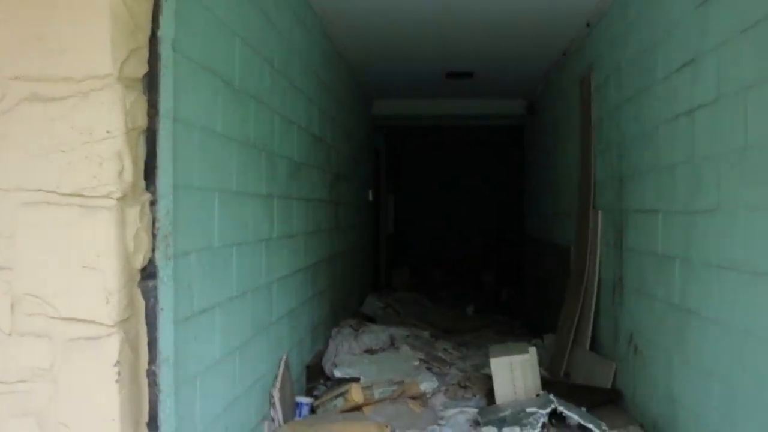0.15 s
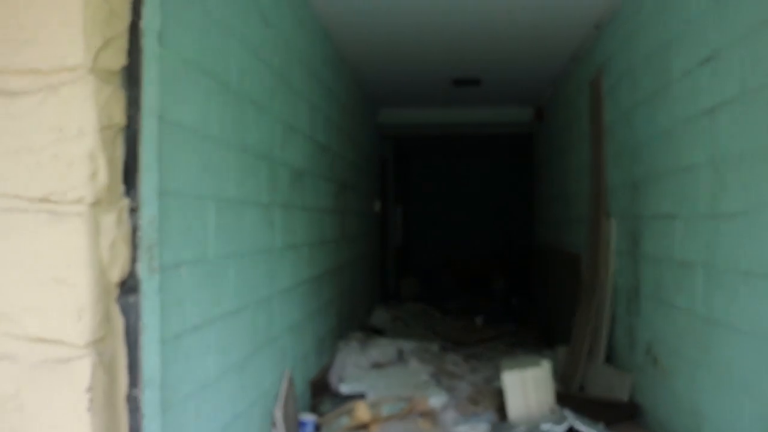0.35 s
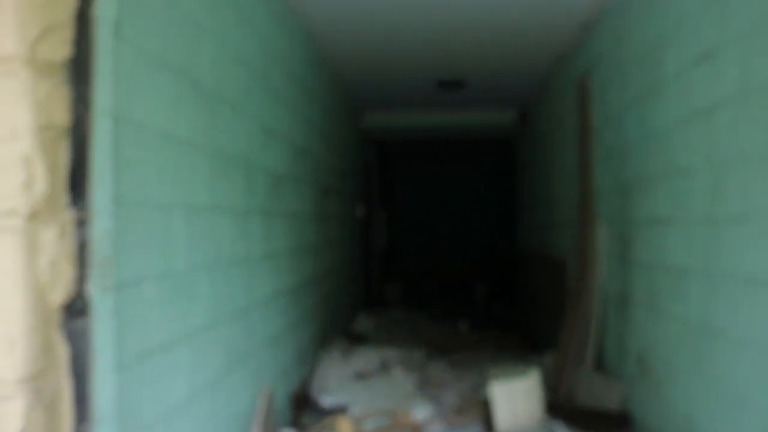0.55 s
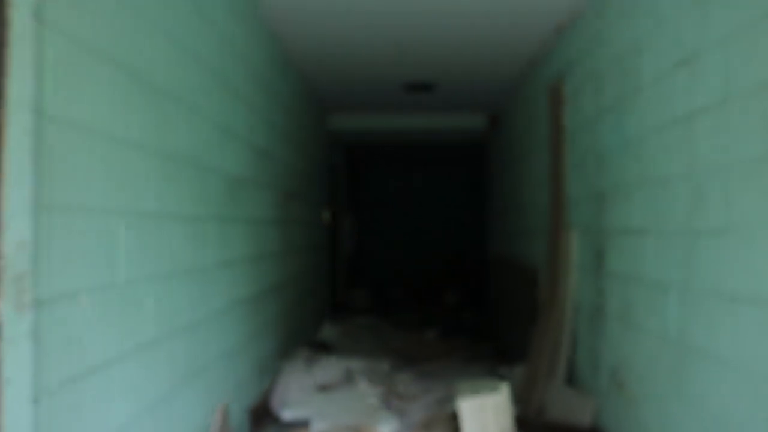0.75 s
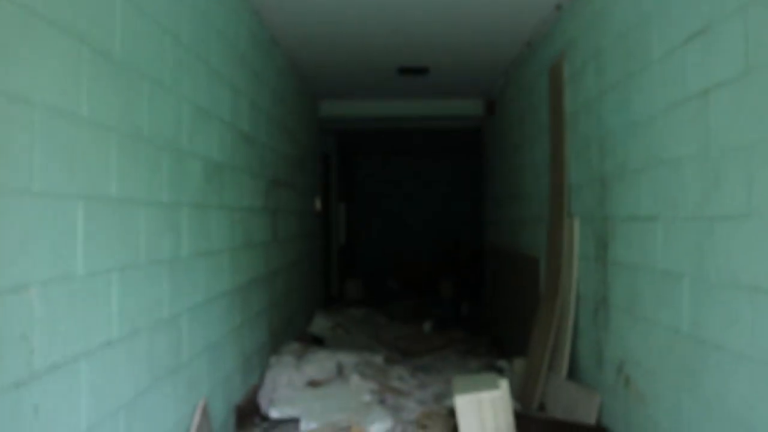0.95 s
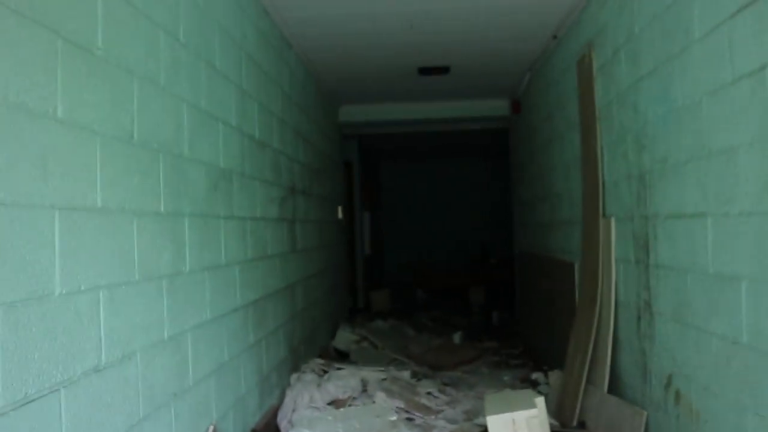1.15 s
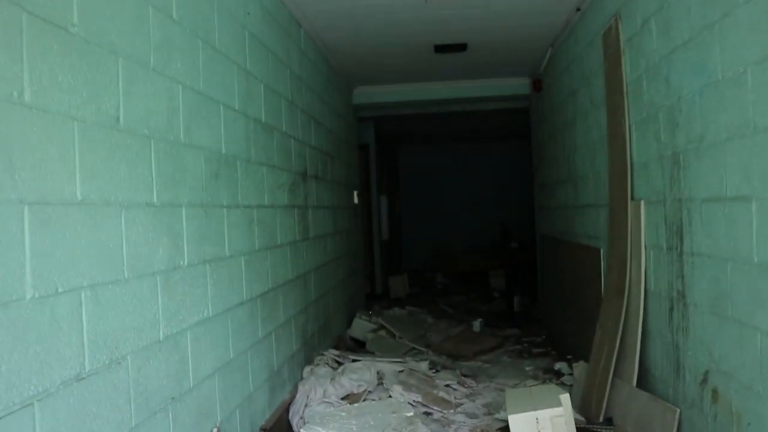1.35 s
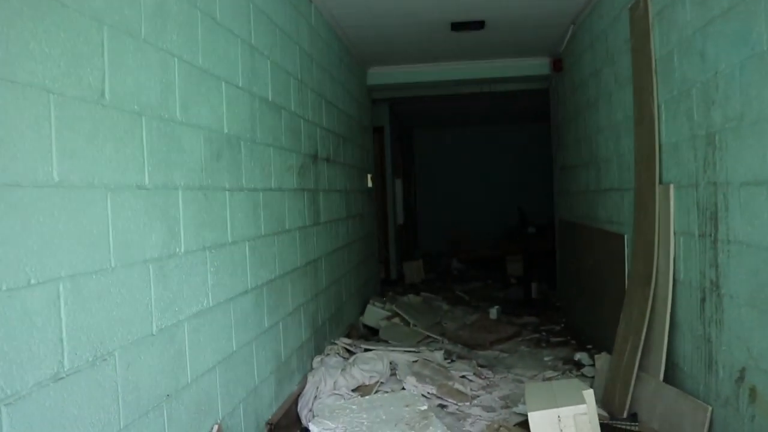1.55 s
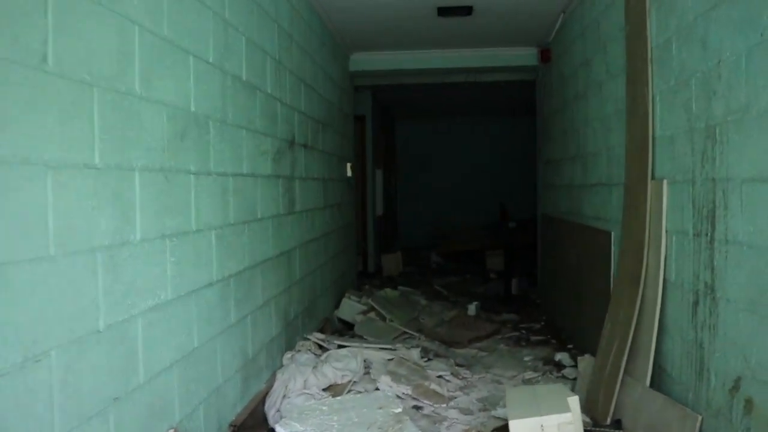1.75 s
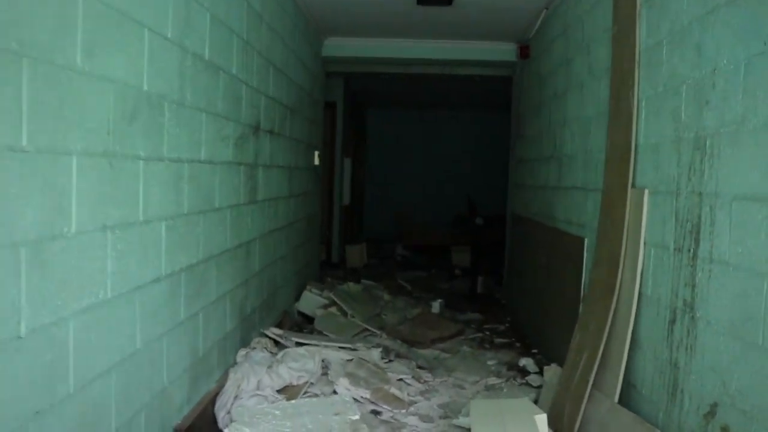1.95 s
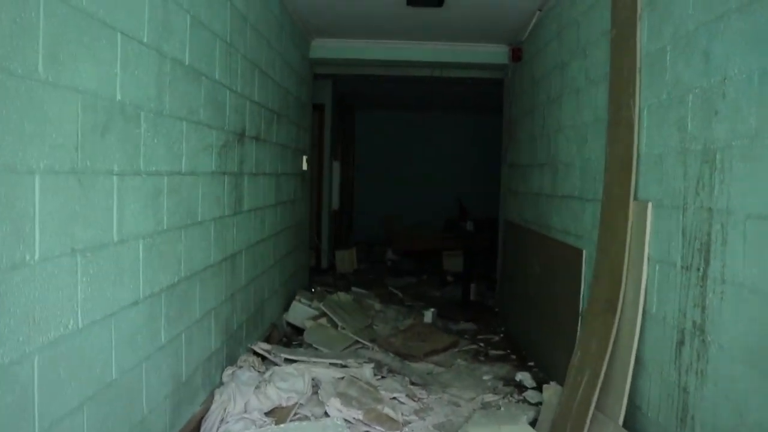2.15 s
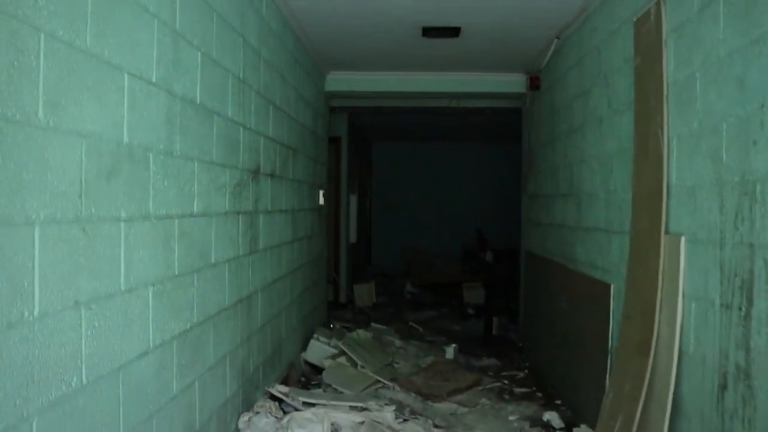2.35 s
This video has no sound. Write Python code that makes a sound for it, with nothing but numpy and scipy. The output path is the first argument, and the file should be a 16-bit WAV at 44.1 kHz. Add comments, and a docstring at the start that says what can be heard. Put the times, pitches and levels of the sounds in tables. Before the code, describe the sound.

Someone steps into a wrecked, narrow corridor, crunching grit, cracking a hollow scrap and kicking tinkling glass, then treading more lightly with small ticks. Close stereo pickup, short slapping echoes, soft outdoor insects and light hiss.

```python
"""Footsteps among rubble in a corridor

A walker steps from a doorway into a narrow, bare block corridor strewn with rubble. A sole crunches grit (showers of
short resonances), a hollow scrap pops and small bits snap (struck resonators), and a kicked glass shard bounces
(ringing modes). The close walls return a flutter of echoes (a damped delay loop) and a diffuse tail. Insects and
a far rumble outside (filtered noise) fade as the microphone moves in; a hum, a drone and microphone hiss lie under."""
import sys
import numpy as np
from scipy import signal
from scipy.fft import rfft, irfft, next_fast_len
from scipy.io import wavfile
from scipy.ndimage import uniform_filter1d

SR = 44100
rng = np.random.default_rng(int(sys.argv[2]) if len(sys.argv) > 2 else 0)


def to_wav(sig):
    """Store sig (one row per channel, or 1-D mono) as 16-bit WAV at the path in sys.argv[1].

    Samples outside -1..1 are clipped; the rate is SR.
    """
    pcm = np.clip(np.atleast_2d(sig), -1, 1) * 32767
    pcm = np.round(pcm).astype(np.int16)
    wavfile.write(sys.argv[1], SR, pcm.T)  # frames by channels


def voltage_ratio(level):
    """Linear amplitude factor for a level in decibels (scalar or array-like)."""
    return 10 ** (np.asarray(level, float) / 20)


N = 110250


def rms_one(x):
    """Normalisation of power: scales a signal to rms 1."""
    return x / np.sqrt(np.mean(x ** 2) + 1e-20)


def in_time(rows):
    """Piecewise-linear envelopes: table columns joined by straight lines, one value a sample."""
    s, *columns = np.transpose(rows)
    return [np.interp(np.arange(N) / SR, s, column) for column in columns]


def at_hz(points, hz):
    """Spectral interpolation: reads a spectrum on a logarithmic frequency axis."""
    table_hz, values = np.transpose(points)
    return np.interp(np.log(hz), np.log(table_hz), values)


def sides(pan_db):
    """Level-difference stereo: left and right gains for a left-minus-right difference in dB."""
    return voltage_ratio(np.array([[.5], [-.5]]) * pan_db)


def drift(rate_hz):
    """Random modulation: noise through a two-pole low-pass near rate_hz, of rms 1."""
    step = 20   # computed at every 20th sample, then interpolated
    r = np.exp(-2 * np.pi * rate_hz * step / SR)
    noise = rng.standard_normal(N // step + 2002)
    slow = signal.lfilter([1], [1, -2 * r, r * r], noise)[2000:]   # skip the onset
    return np.interp(np.arange(N) / step, np.arange(len(slow)), rms_one(slow))


def ring(clicks, hz, t60):
    """Damped oscillation: a unit click sets going a sine of initial height 1, falling 60 dB in t60 s."""
    r, w = voltage_ratio(-60 / (t60 * SR)), 2 * np.pi * hz / SR
    return signal.lfilter([0, np.sin(w)], [1, -2 * r * np.cos(w), r * r], clicks + 1e-18)


# A sole pressing and dragging grit: t/s, level/dB, f/Hz of the emphasised grains,
# tilt towards small, high grains/(dB per octave)
SOLE_PRESSURE = [(0, -33, 2470, 1), (.03, -44, 2450, 0.5), (.1, -57.5, 1690, -4), (.236, -61, 4000, 2.5),
                 (.246, -24.5, 3930, 0), (.258, -27.5, 3530, 1.5), (.268, -22.5, 730, 0),
                 (.29, -22.5, 1070, 1), (.315, -29.5, 1470, 3), (.335, -34.5, 1500, 1.5),
                 (.39, -42, 3000, 3.5), (.41, -18.5, 7100, 0), (.435, -29.5, 5500, 4.5),
                 (.46, -29.5, 5600, 2), (.5, -41, 4900, 0.5), (.575, -46, 5970, 3), (.59, -23, 6800, 1),
                 (.64, -49.5, 6700, -1), (1.05, -59.5, 3000, 1), (1.15, -44, 1450, 2),
                 (1.195, -47, 4060, -0.5), (1.203, -33.5, 5550, 0.5), (1.24, -41, 5100, 0.5),
                 (1.33, -58, 3000, 7), (1.6, -61, 2007, 5), (1.65, -38.5, 2520, -3), (1.7, -64, 2000, 12.5),
                 (1.8, -49, 1510, 2.5), (1.85, -42, 610, -0.5), (1.89, -47, 497, -3.5),
                 (1.92, -40, 1290, -2), (1.97, -54.5, 1000, 4), (2.02, -42.5, 890, -2),
                 (2.07, -54, 3030, 9), (2.11, -46, 1500, -0.5), (2.2, -76, 2000, 18)]
# Weight of the grains by pitch: f/Hz, level/dB
GRAIN_WEIGHT = [(250, -15), (500, -10), (800, -10.5), (1400, -10.5), (2500, -13.5), (4000, -13),
                (7000, -15), (10500, -22.5), (15500, -30)]
GRAINS_PER_S, GRAIN_SPREAD_DB = 12000, 0.5   # median rate; scale of the random spread in strength
GRAIN_T60_CYCLES = 20.7
GRAIN_PEAK_OCTAVES, GRAIN_PEAK_DB = 0.21, 6   # width and height of the emphasis


def grit():
    """Granular excitation: grains crack at random, each ringing briefly, stressed near the sole's pitch."""
    level_db, peak_hz, tilt_db = in_time(SOLE_PRESSURE)
    strength = voltage_ratio(GRAIN_SPREAD_DB * np.minimum(rng.exponential(1, N), 5)) * rng.choice([-1, 1], N)
    born = rng.random(N) < GRAINS_PER_S * voltage_ratio(2.2 * drift(80)) / SR
    pitches = np.geomspace(300, 15000, 28)
    dealt = rng.integers(0, len(pitches), N)
    grain_hz = pitches[dealt]
    octaves_off = np.log2(grain_hz / peak_hz)
    near_db = GRAIN_PEAK_DB * np.exp(-.5 * (octaves_off / GRAIN_PEAK_OCTAVES) ** 2)
    colour = voltage_ratio(near_db + tilt_db * np.log2(grain_hz / 2000))
    clicks = strength * born * colour * sides(rng.normal(0, 1.33, N))
    out = np.zeros((2, N))
    for k, hz in enumerate(pitches):
        lag = rng.integers(-5, 6)   # samples between the two microphone ports
        weight = voltage_ratio(at_hz(GRAIN_WEIGHT, hz)) * hz
        left, right = weight * ring(clicks * (dealt == k), hz, GRAIN_T60_CYCLES / hz)
        out += [left, np.roll(right, lag)]
    # even out the running rms so that the level follows the table
    running_rms = np.sqrt(uniform_filter1d(np.mean(out ** 2, axis=0), size=4000) + 1e-20)
    return voltage_ratio(level_db) * out / running_rms


# Bits that snap, pop or thud underfoot: t/s, peak level of the pulse before panning/dB, nominal f/Hz,
# relative ring length/cycles, left-minus-right level/dB
SNAP_EVENTS = [(.007, -19.5, 5800, 1.3, -2), (0.2344, -23, 3000, .8, 3), (.2337, -31, 9000, 8.0, 0),
               (.263, -19, 740, 7.3, -3), (0.3958, -2.5, 1130, 2.9, 0.5), (0.398, -9.5, 2350, 4.2, 7.5),
               (0.242, -20, 3860, 14, -6), (.3965, -18, 8800, 2.0, 0), (0.414, -27, 7800, 13, 0),
               (1.84, -42, 130, 2.5, -15), (.4505, -11, 1356, 4.5, 1.5), (0.5823, -8.5, 4630, 0.5, -5.5),
               (.815, -47, 79.5, 4.0, 0), (1.1985, -9, 6000, 1.8, -1), (1.204, -20.5, 1050, 1.7, 0),
               (1.4267, -31.5, 11400, 9.0, 10), (1.473, -38, 594, 5.5, -3), (1.508, -29.5, 6530, 3.0, -4),
               (1.644, -28, 2110, 2.8, -6), (1.7087, -36, 7540, 3.4, -2), (1.7498, -20, 7780, 3.0, -3),
               (1.816, -23.5, 1420, 1.35, 2), (0.588, -30.5, 480, 1.9, 1), (1.65, -32, 2250, 1.8, 7),
               (2.026, -36, 11000, 3.2, 0), (2.051, -38, 8500, 3.0, 0), (1.837, -27, 336, 1.7, -1),
               (1.8417, -46, 6000, 1.5, -1), (1.9344, -14, 7750, 5.7, -10), (2.0629, -30.5, 8800, 3.3, -7)]
SPLINTER_DB, SPLINTER_T60_CYCLES = -14.5, 204   # splinters that patter after a snap


def fragment(excitation, hz, t60):
    """Cascaded resonance: two detuned damped oscillators in series, high-passed below their pitch."""
    rung = ring(ring(excitation, hz * 1.075, t60), hz / 1.05, t60)
    cut = signal.butter(3, 0.53 * hz, "high", fs=SR, output="sos")
    return signal.sosfilt(cut, rung)


def snaps():
    """Impulse response: a click and a dying patter of splinters both excite each fragment's resonance."""
    length = SR // 8
    out = np.zeros((2, N))
    patter = rng.standard_normal((len(SNAP_EVENTS), 2, length)) ** 3 / 4   # cubing makes it spiky
    for (s, level_db, hz, cycles, pan_db), noise in zip(SNAP_EVENTS, patter):
        t60 = 1.73 * max(cycles, .5) / hz
        pulse = fragment(np.arange(length) == 0, hz, t60)
        peak = np.abs(pulse).max()
        # low fragments have splinters that die as fast as those of 2500 Hz
        decay_db = -60 * np.arange(length) / SR * max(hz, 2500) / SPLINTER_T60_CYCLES
        splinters = fragment(noise * voltage_ratio(SPLINTER_DB + decay_db), hz, t60)
        splinters *= peak / np.sqrt(np.sum(pulse ** 2))
        snap = voltage_ratio(level_db) * sides(pan_db) * (pulse + splinters) / peak
        i = int(s * SR)
        out[:, i:i + length] += snap[:, :N - i]
    return out


# Modes of the glass shard: f/Hz, relative level/dB, t60/s
SHARD_MODES = [(1407, 3, .2), (2573, 8, 0.14), (3680, -0.5, 0.13), (5134, 7, 0.042), (6580, -4, 0.17),
               (6939, 5, 0.075), (7348, -4, 0.2), (9030, -4, 0.19), (10360, -1.5, 0.28), (10745, 3, 0.19),
               (12240, -12, 0.27), (12900, -10, 0.3), (14700, -7, 0.28)]
# Its strikes: t/s, relative level/dB, favoured f/Hz, reach about it/octaves, left-minus-right level/dB; those
# at .7098 and .8303 s repeat the hits just before them, about 8 ms later
SHARD_STRIKES = [(.413, -19.5, 12900, 0.091, 1), (.436, -28, 12900, 0.1, -2), (.497, -39, 3680, 0.2, 13),
                 (.5551, -28, 2490, 0.68, 4), (.5631, -23.5, 1470, 0.26, 5.5),
                 (.5826, -27, 9450, 0.33, -2.5), (.59, -22.5, 7040, 0.13, -1),
                 (0.608, -27.5, 3680, 0.25, 8), (.645, -39, 3680, 0.12, -7), (.702, -32.5, 2620, 0.45, 2.5),
                 (.7098, -37.5, 4050, 0.35, 0.5), (.823, -31.5, 4900, 0.19, -0.5),
                 (0.8303, -41.5, 5700, 1.0, 0.5)]
TUMBLE_DB, TUMBLE_HZ = 3, 64   # the shard turns as it flies: rms waver and its rate
TWIN_DETUNING, TWIN_DB, TWINS_FROM_HZ = .006, -5, 4500


def shard():
    """Modal synthesis: strikes excite all modes, favouring one pitch; high ones beat with a twin, all waver."""
    s, level_db, favoured_hz, reach, pan_db = np.transpose(SHARD_STRIKES)
    chance_db = rng.normal(0, 1.0, (len(s), len(SHARD_MODES)))
    start = int(s[0] * SR)
    strikes = (s * SR).astype(int) - start
    out = np.zeros((2, N))
    for k, (hz, mode_db, t60) in enumerate(SHARD_MODES):
        off_db = -np.minimum(5.6 * (np.log2(hz / favoured_hz) / reach) ** 2, 30)
        clicks = np.zeros((2, SR))
        clicks[:, strikes] = voltage_ratio(level_db + mode_db + off_db + chance_db[:, k]) * sides(pan_db)
        rung = ring(clicks, hz, t60)
        if hz > TWINS_FROM_HZ:
            rung += voltage_ratio(TWIN_DB) * ring(clicks, hz * (1 + TWIN_DETUNING), 0.63 * t60)
        left, right = rung * voltage_ratio(TUMBLE_DB * drift(TUMBLE_HZ)[:SR])
        lag = rng.integers(0, 7)   # samples between the two microphone ports
        out[:, start:start + SR] += [left, np.roll(right, lag)]
    return out


# Loss per round trip between the walls: f/Hz, level/dB
WALL_LOSS = [(100, -16.5), (600, -10.5), (900, -4.5), (1300, -3), (1800, -5), (2500, -6), (5000, -5.5),
             (16000, -21)]
# Decay of the diffuse tail: f/Hz, t60/s
TAIL_DECAY = [(100, 0.17), (1000, 0.25), (4000, 0.24), (9000, 0.32), (16000, 0.16)]
ROUND_TRIP_M, SOUND_M_S = 2.62, 343
FLUTTER_DB, TAIL_DB = -0.5, -15
PORT_LAG_S = 0.00011   # the left port hears the flutter later


def corridor(x):
    """Flutter echo and reverberation: direct sound, a wall-to-wall loop and ten looping paths a side."""
    size = next_fast_len(N + SR)
    hz = np.maximum(np.fft.rfftfreq(size, 1 / SR), 1)

    def delay(s):
        """Pure delay: a phase shift proportional to frequency."""
        return np.exp(-2j * np.pi * hz * s)

    spectrum = rfft(x, size)
    loop = np.minimum(voltage_ratio(at_hz(WALL_LOSS, hz)), .95) * delay(ROUND_TRIP_M / SOUND_M_S)
    flutter = voltage_ratio(FLUTTER_DB) * loop / (1 - loop) * np.array([delay(PORT_LAG_S), delay(0)])
    t60 = np.maximum(at_hz(TAIL_DECAY, hz), .05)
    tail = np.zeros((2, len(hz)), complex)
    for k, lag in enumerate(rng.uniform(.003, .035, 20)):
        path = voltage_ratio(-60 * lag / t60) * delay(lag)
        tail[k % 2] += np.sqrt(lag / 0.019) * path / (1 - path) * (-1) ** (k // 2)
    for lag in (.0011, .0023, .0047):   # all-pass filters thicken the echoes
        tail *= (delay(lag) - .6) / (1 - .6 * delay(lag))
    wet = spectrum * (1 + flutter) + voltage_ratio(TAIL_DB) * spectrum.mean(axis=0) * tail
    return irfft(wet, size)[:, :N]


# Correlation of left and right: f/Hz, coefficient
STEREO_CORRELATION = [(60, 0.89), (180, 0.89), (550, 0.77), (1650, -0.34), (4970, 0.063), (15000, -0.14)]
# Balance of the two sides: f/Hz, left-minus-right level/dB
STEREO_BALANCE = [(60, 1.5), (240, 1), (950, 0.5), (3770, -1.5), (15000, -0.5)]


def coloured(spectrum):
    """Spectral shaping: stereo noise of a given spectrum, correlation and balance, of rms 1."""
    hz = np.maximum(np.fft.rfftfreq(N, 1 / SR), 1)
    mid, side = rfft(rng.standard_normal((2, N)))
    alike = np.clip(at_hz(STEREO_CORRELATION, hz), -1, 1)
    pair = np.sqrt(1 + alike) * mid + np.sqrt(1 - alike) * side * [[1], [-1]]
    gains = voltage_ratio(at_hz(spectrum, hz)) * sides(at_hz(STEREO_BALANCE, hz))
    return rms_one(irfft(pair * gains, N))


def narrow(hz, width_hz, own):
    """Band-pass filtering: narrow noise of rms 1; own weights the part peculiar to each channel."""
    band = signal.butter(2, [hz - width_hz / 2, hz + width_hz / 2], "band", fs=SR, output="sos")
    return rms_one(signal.sosfilt(band, rng.standard_normal(N) + own * rng.standard_normal((2, N))))


# Outdoor sound through the doorway: t/s, relative rumble level/dB, mean insect level/dB
OUTDOOR_LEVELS = [(0.0, -46.5, -50.5), (0.3, -45.5, -49), (0.43, -47.5, -45.5), (0.88, -45.5, -52),
                  (1.38, -46.5, -52.5), (2.5, -50.5, -60.5)]
# Relative spectral density of the far rumble: f/Hz, level/(dB per Hz)
RUMBLE_SPECTRUM = [(15, -38), (25, -9), (81, -4), (229, -7), (622, -9.5), (812, -6), (1110, -9.5),
                   (1540, -9), (3070, -20), (5000, -24), (6500, -43), (11000, -120)]
INSECT_HZ, INSECT_WIDTH_HZ, INSECT_THROB_DB = 6080, 1000, 2
HUM_HZ, HUM_WIDTH_HZ, HUM_DB = 86.2, 8.4, -57   # low, and it wavers
DRONE_HZ, DRONE_WIDTH_HZ, DRONE_DB = 456, 67, -47.5   # faint and dull
DRONE_CENTRE_S, DRONE_SPREAD_S = 1.44, 0.087   # it swells once


def outside():
    """Amplitude-modulated noise bands: far rumble, a hum, a drone that swells once and throbbing insects."""
    rumble_db, insect_db = in_time(OUTDOOR_LEVELS)
    rumble = coloured(RUMBLE_SPECTRUM) * voltage_ratio(rumble_db + 2.5 + 0.27 * drift(18))
    hum = narrow(HUM_HZ, HUM_WIDTH_HZ, own=0.21) * voltage_ratio(HUM_DB)
    swell = np.exp(-.5 * ((np.arange(N) / SR - DRONE_CENTRE_S) / DRONE_SPREAD_S) ** 2)
    drone = narrow(DRONE_HZ, DRONE_WIDTH_HZ, own=.3) * voltage_ratio(DRONE_DB) * swell
    throb_db = INSECT_THROB_DB * drift(56)
    insects = narrow(INSECT_HZ, INSECT_WIDTH_HZ, own=3.3) * voltage_ratio(insect_db + throb_db)
    return rumble + hum + drone + insects


# Relative spectral density of the microphone hiss: f/Hz, level/(dB per Hz)
HISS_SPECTRUM = [(1500, -23), (3000, -8), (6000, -1.5), (9000, -4), (12000, -8), (16300, -9)]


def microphone_hiss():
    """Stationary self-noise: shaped random noise at a constant level."""
    return voltage_ratio(-59) * coloured(HISS_SPECTRUM)


def scene():
    """Superposition: feet and shard in the corridor over the sound from outside."""
    return corridor(grit() + snaps() + shard()) + outside()


def band_limit(x):
    """A steep low-pass at the top of the band."""
    return signal.sosfilt(signal.butter(12, 16320, fs=SR, output="sos"), x)


def record(dry):
    """Limits of the receiver: hiss is added, peaks are clipped and the top is cut by a steep low-pass."""
    heard = np.clip(dry + microphone_hiss(), -1, 1)
    low_pass = signal.cheby2(12, 70, 16500, fs=SR, output="sos")   # order, stopband/dB, its edge/Hz
    finished = signal.sosfilt(low_pass, heard)
    return band_limit(finished)


dry = scene()
out = record(dry)
to_wav(out)
```